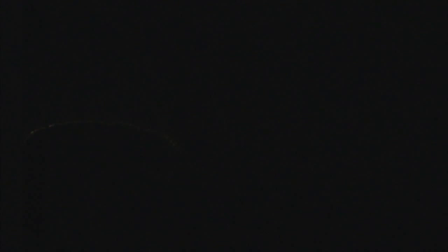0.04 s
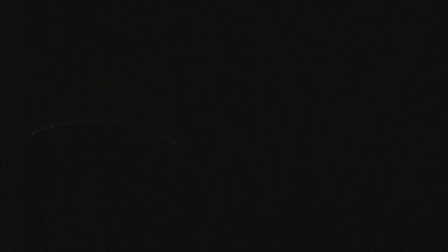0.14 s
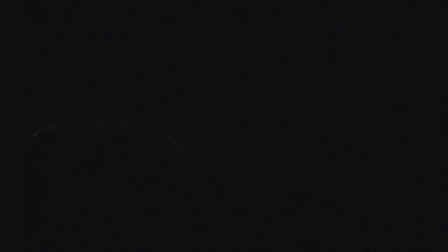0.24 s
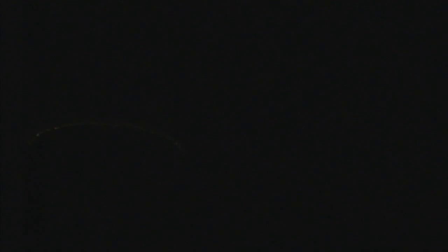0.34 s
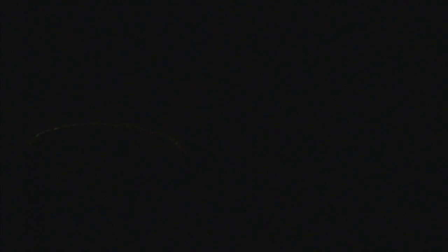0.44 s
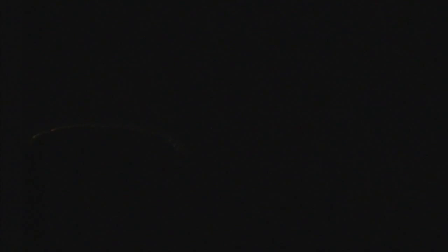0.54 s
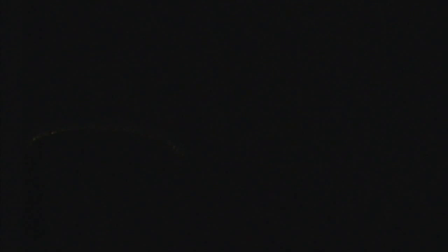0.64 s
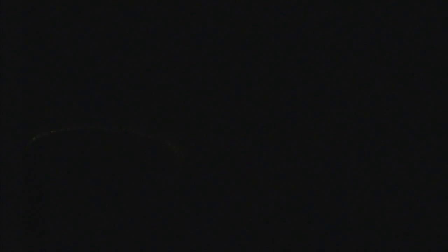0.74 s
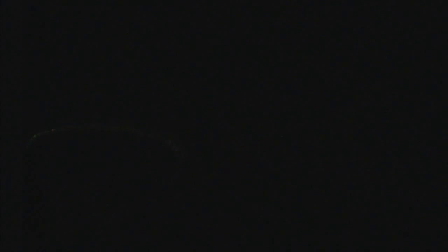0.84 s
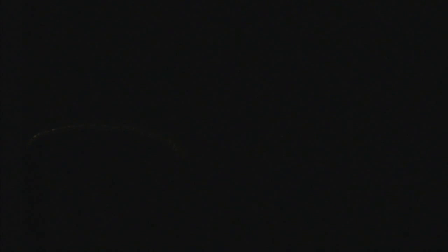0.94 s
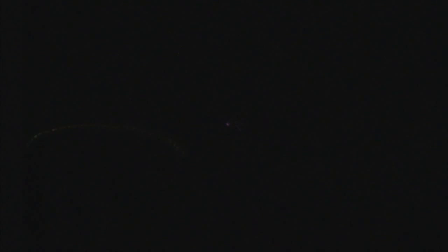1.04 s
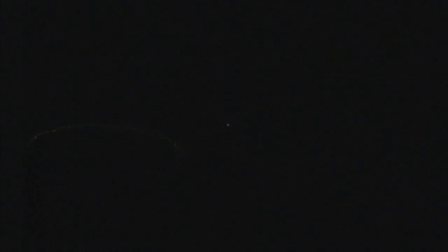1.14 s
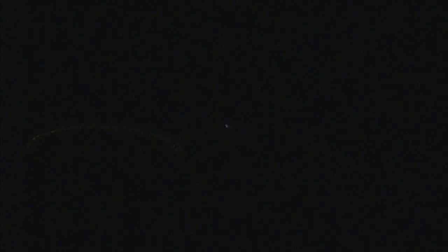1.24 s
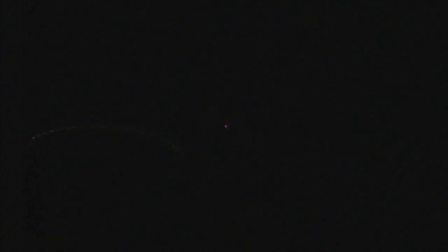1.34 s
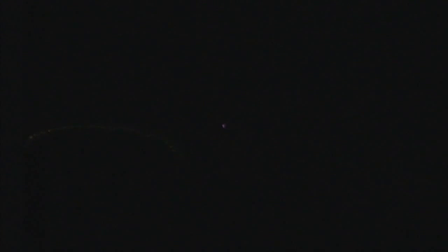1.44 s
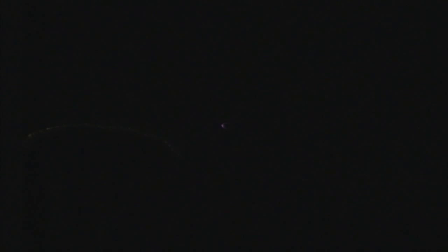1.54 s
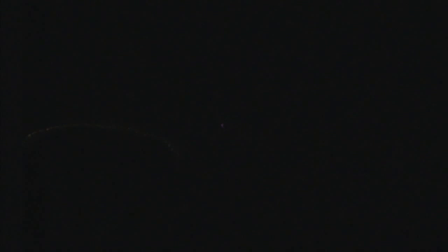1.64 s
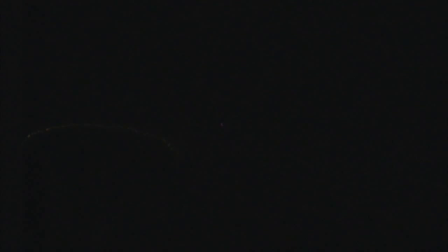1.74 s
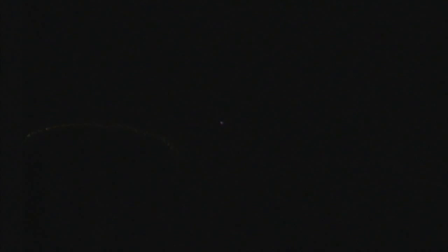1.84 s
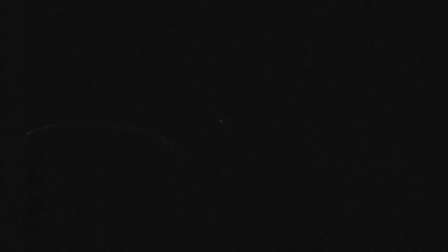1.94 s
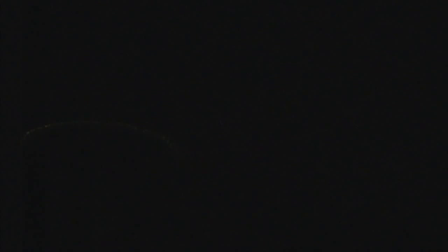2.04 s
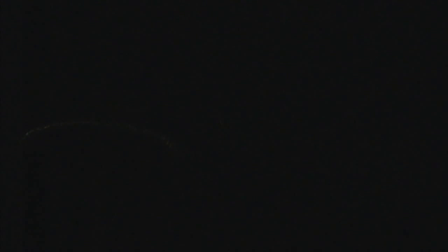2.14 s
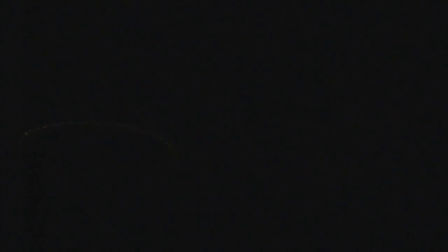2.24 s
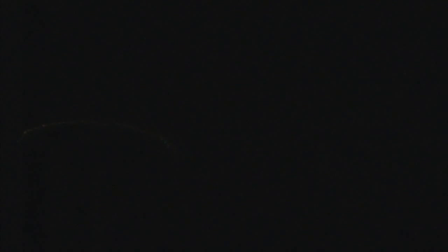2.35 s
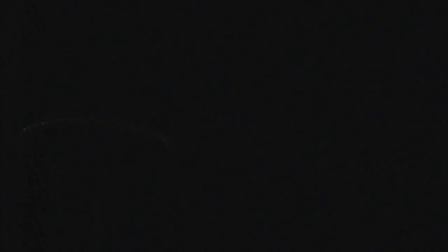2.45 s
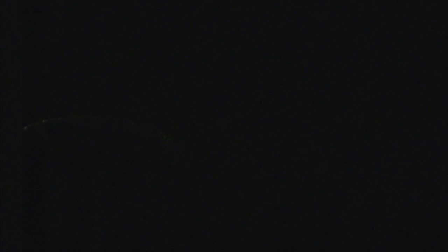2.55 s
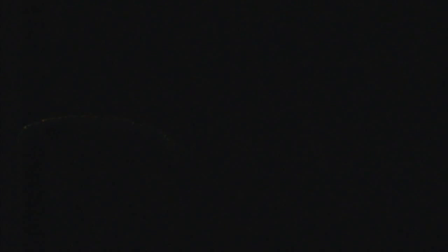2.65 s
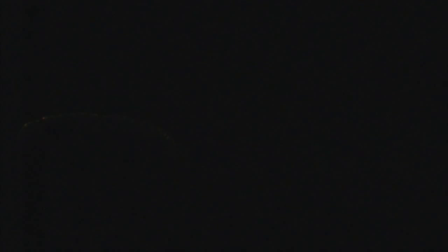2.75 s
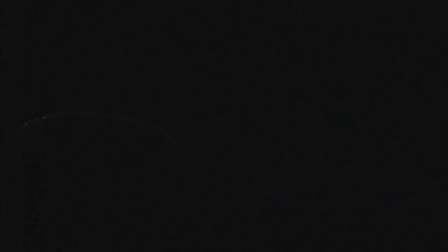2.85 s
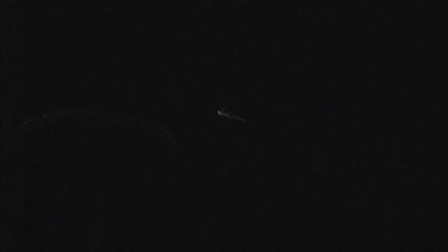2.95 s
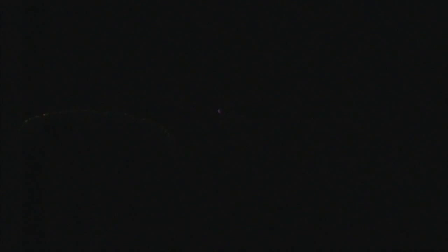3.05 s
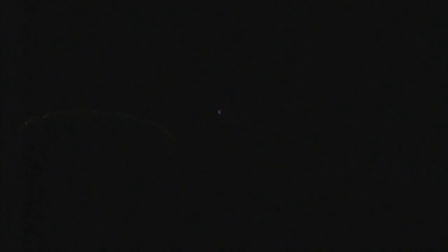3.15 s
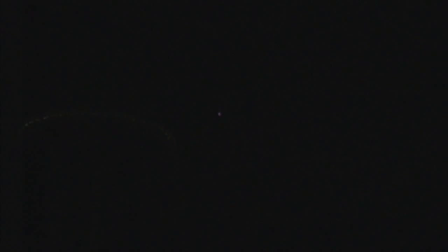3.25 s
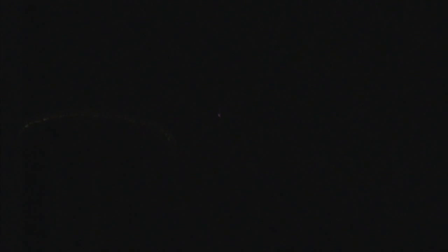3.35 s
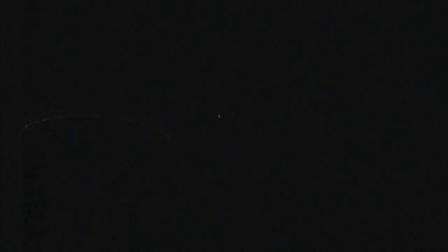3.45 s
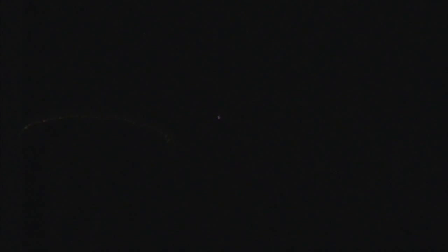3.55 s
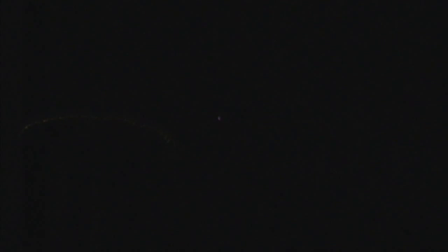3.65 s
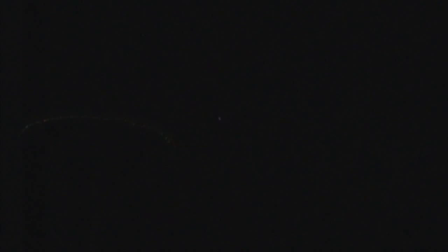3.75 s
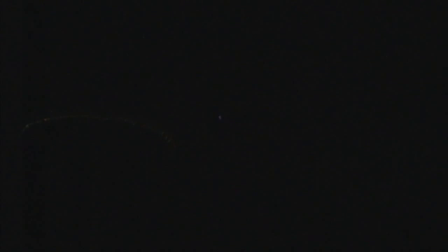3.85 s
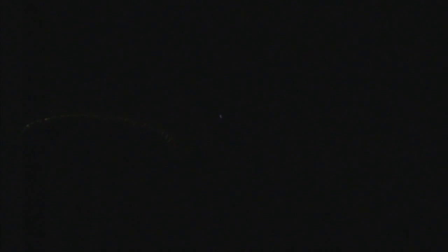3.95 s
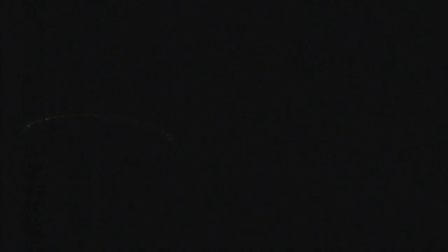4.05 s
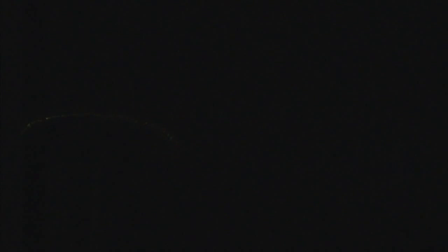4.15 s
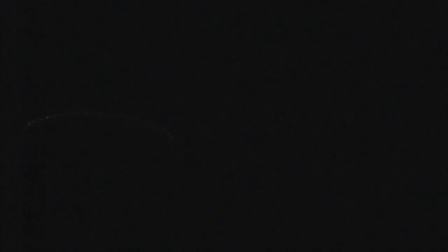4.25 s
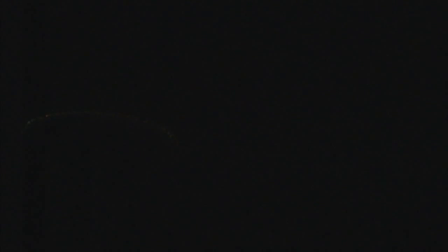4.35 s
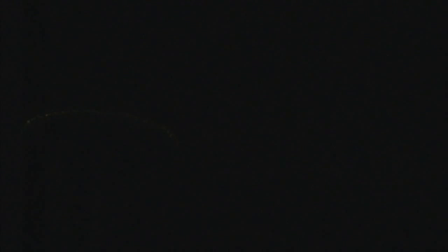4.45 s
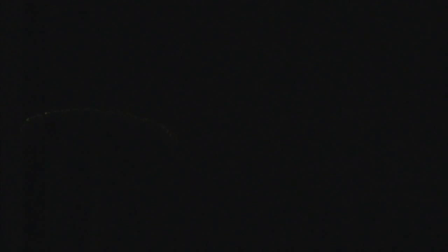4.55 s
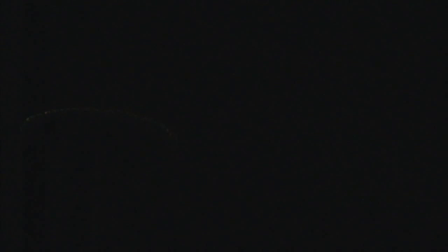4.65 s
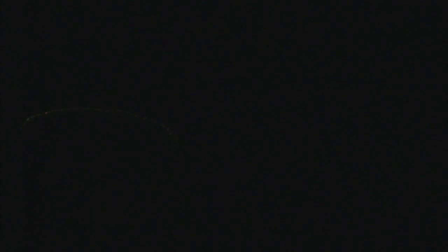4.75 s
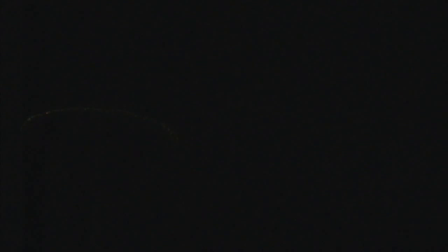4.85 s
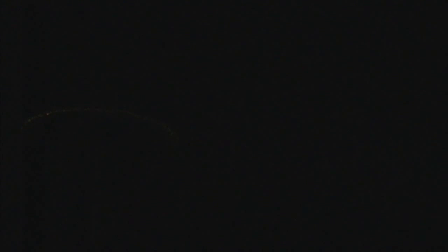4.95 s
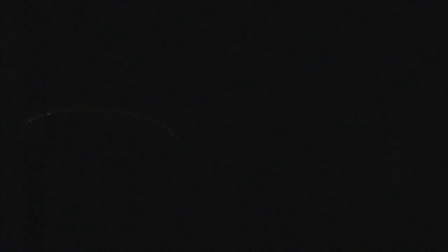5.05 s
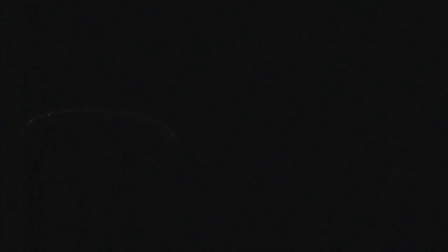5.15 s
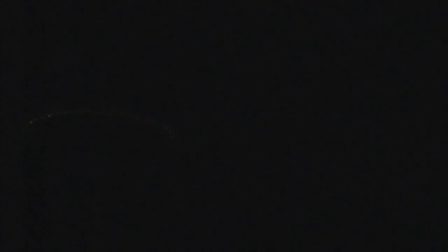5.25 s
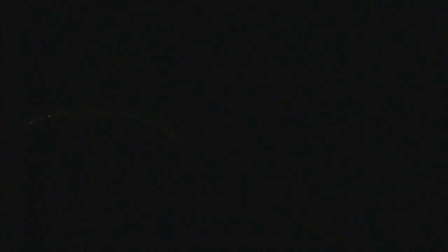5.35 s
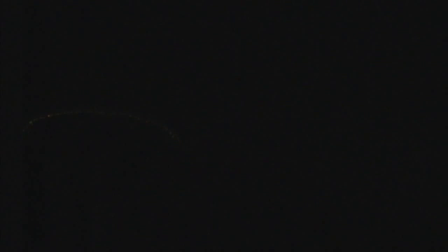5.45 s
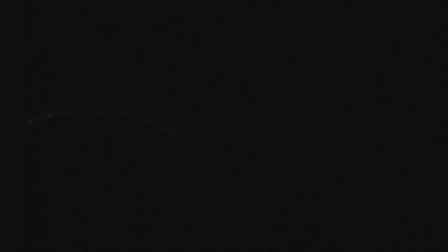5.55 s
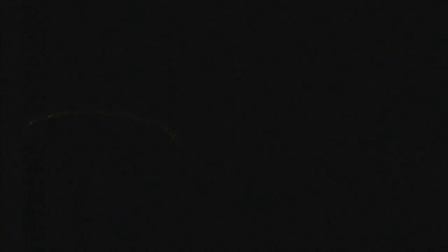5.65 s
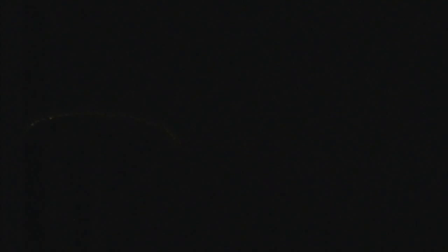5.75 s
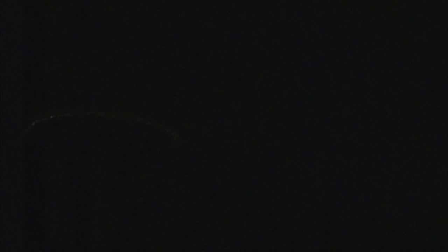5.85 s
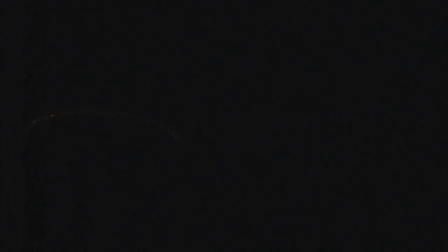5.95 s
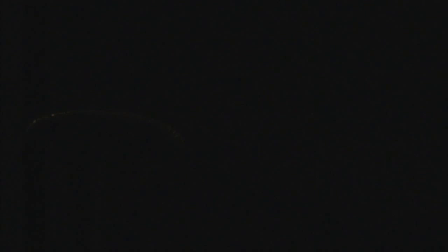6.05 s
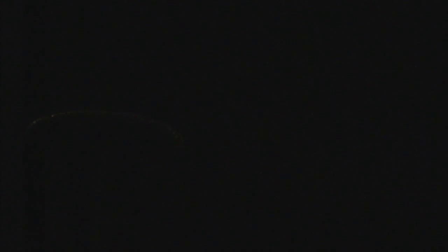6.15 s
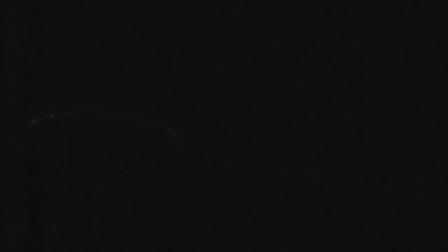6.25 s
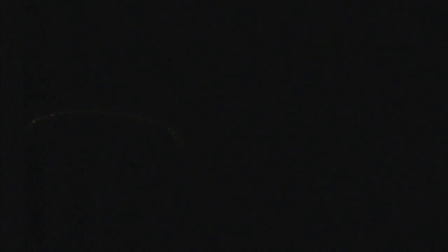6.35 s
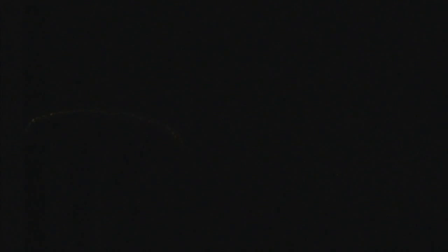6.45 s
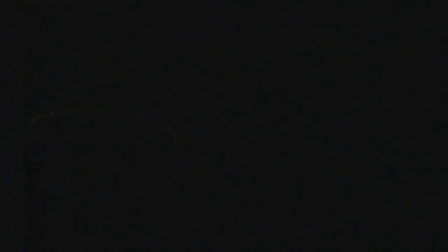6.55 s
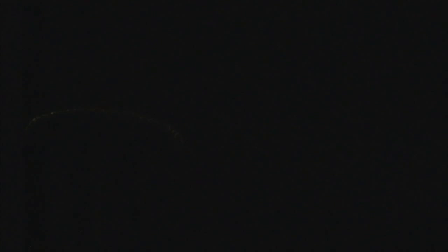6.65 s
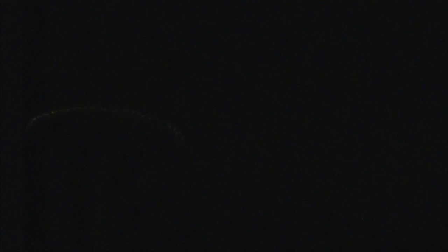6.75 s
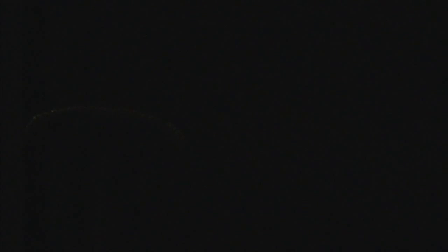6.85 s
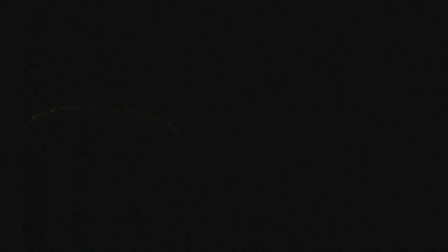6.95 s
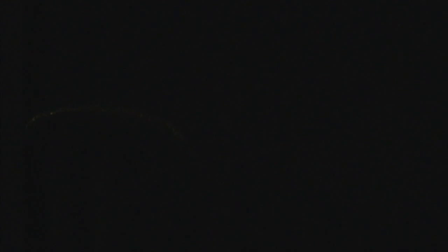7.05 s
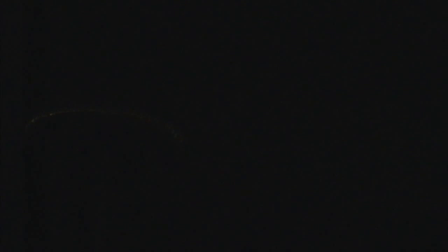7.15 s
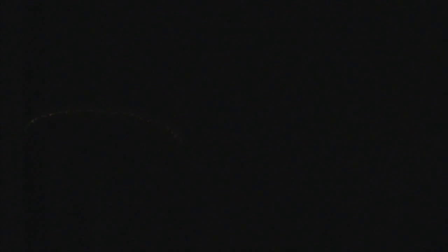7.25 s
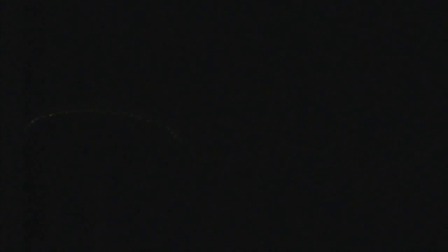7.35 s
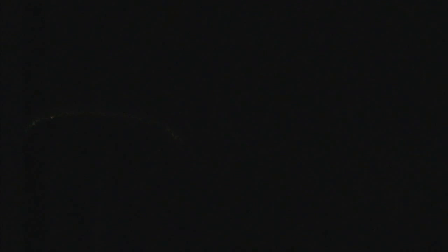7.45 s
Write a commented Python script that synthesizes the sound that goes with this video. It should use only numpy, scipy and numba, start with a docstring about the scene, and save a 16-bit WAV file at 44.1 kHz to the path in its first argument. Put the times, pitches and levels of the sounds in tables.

```python
"""A short, harsh buzz and a crack come first: a spark-gap coil is running outdoors at night.
In each half-wave of the mains its gap fires a quick volley of sparks, which blur into a buzzing hiss.
Two longer bursts start and stop with cracks; later the coil only snaps singly. A blower hisses and
whines throughout, and wind nudges the microphone. The camera's gain control turns all this down
under each burst and slowly lets it back."""
import sys
import numpy as np
from scipy import signal
from scipy.fft import rfft, irfft
from scipy.io import wavfile
from scipy.ndimage import uniform_filter1d, minimum_filter1d
from numba import njit

SR = 44100
rng = np.random.default_rng(int(sys.argv[2]) if len(sys.argv) > 2 else 0)


def transcribe(signal):
    """Save signal, clipped to [-1, 1], as a 16-bit WAV file at the path in sys.argv[1]."""
    frames = np.atleast_2d(signal).T
    limited = np.clip(frames, -1, 1)
    pcm = np.round(limited * 32767).astype(np.int16)
    wavfile.write(sys.argv[1], SR, pcm)


N = 331014
TAPS = 4096  # filter length in samples
T = np.arange(N) / SR
HZ = np.maximum(np.arange(TAPS // 2 + 1) * SR / TAPS, 1)
MAINS_HZ = 60

# when the coil runs: on t/s, off t/s, starting level/dB, thin metal's relative level/dB
BURSTS = [(-.02, .045, 3.5, 3), (1.03, 2.07, -12, 7), (3.001, 4.036, -12.5, -11)]
# pitches at which the gap and its housing ring: f/Hz, width/Hz, level/dB
HOUSING_RINGS = [(670, 70, -16), (1180, 220, -14), (1440, 140, -12), (1620, 130, -13), (1830, 170, -9),
                 (2100, 120, -17), (2300, 150, -16), (2570, 210, -4), (2850, 300, -6), (3230, 190, -10),
                 (3850, 240, -10), (4300, 220, -12), (4600, 300, -13), (5030, 200, -14), (5660, 220, -12),
                 (6200, 380, -11), (6560, 260, -3), (7090, 190, -1), (7380, 230, 0), (7890, 150, -5),
                 (8360, 290, 0), (8850, 380, -4), (9220, 250, -8), (10100, 700, -14), (10720, 330, -9),
                 (11200, 480, -11), (13080, 680, -6), (14040, 300, -3), (14650, 420, -6), (15450, 900, -2)]
# single heavy sparks: t/s, level/dB, crack length/s, boosted f/Hz
HEAVY_SPARKS = [(0.0675, -8.5, 0.0006, 2400), (1.0098, -11, 0.0042, 2470), (1.0188, -4, 0.0008, 7240),
                (1.0241, -3.5, 0.00048, 7940), (1.0312, 3, 0.00045, 7550), (2.079, -11.5, 0.0015, 2400),
                (2.9809, -13, 0.0014, 7000), (2.991, -2, 0.0011, 7300), (3, -8, 0.00052, 4000),
                (3.0062, 1, 0.00063, 7500), (4.044, -10, 0.0011, 2600), (4.8704, -12, 0.0014, 3480),
                (5.7225, -9, 0.00074, 10100), (6.0705, -32.5, 0.0012, 2300), (6.6715, -10.5, 0.0015, 2340)]
# tone colour of a heavy spark: f/Hz, level/dB
SNAP_COLOUR = [(25, -65), (100, -52), (500, -4.5), (1200, -2), (1800, -7), (2400, -7), (3300, -5.5),
               (4100, -5.5), (4700, -9), (5400, -4), (8200, -11), (9900, -5.5), (11200, -10), (12600, -11),
               (16000, -7.5)]
# a dip and peaks that make heavy sparks ring hollowly: f/Hz, width/Hz, lift/dB
HOLLOW_RINGS = [(850, 450, -10), (2280, 320, 7), (4120, 360, 3.5), (5250, 360, 3.5)]
# tone colour of the blower's rushing air: f/Hz, level/dB
RUSH_COLOUR = [(30, -56), (70, -15), (150, -5), (340, -11.5), (900, -5), (1250, 0.5), (2100, -4.5),
               (3200, -2), (5000, -9.5), (7400, -4), (8700, -11.5), (9800, -18.5), (12000, -19),
               (16000, -33)]
# pitches that the blower's duct boosts: f/Hz, width/Hz, lift/dB
DUCT_RINGS = [(506, 390, 6), (1160, 330, 4), (1787, 290, 6), (3016, 720, 5), (3425, 130, 5.5),
              (4360, 460, 9.5), (5300, 440, 7.5), (8800, 300, 3)]
# tones of the blower's whine: multiple of the blade rate, level/dB
BLADE_TONES = [(1, -58.5), (2, -49.5), (3, -50), (5, -55.5), (7, -57.5)]
# the strongest puffs of wind on the microphone: t/s, relative level/dB, length/s
WIND_PUFFS = [(.425, -37, 0.02), (0.906, -31.5, 0.012), (1.181, -40, .029), (1.701, -34, 0.069),
              (4.439, -31.5, 0.021), (4.485, -27, 0.017), (5.127, -45, 0.022), (5.567, -34.5, 0.0089),
              (5.595, -36, 0.014), (5.655, -37.5, 0.02), (7.18, -41, .03), (7.369, -42, .025)]
# tone colour of the wind: f/Hz, level/dB
WIND_COLOUR = [(30, -34), (70, -15), (120, -1.5), (180, 2), (300, -3), (480, -21.5), (1000, -27),
               (4000, -73)]


def buzz(metal_hz=13690, broad_db=-24, bass_cut_hz=1000, leak_db=-14, linger_db=-24, panel_db=-41.5):
    """Sparks ring the housing, which gives off little bass; thin metal sings and a panel hums."""
    power_db, metal_gain = coil_growth()
    clicks = spark_volleys() * undb(power_db)
    clicks = scatter(clicks, lags_s=[.00017, .00029, .00043], share=0.63)
    ring_power = sum((undb(db) * bell(hz, width)) ** 2 for hz, width, db in HOUSING_RINGS)
    rings = np.sqrt(ring_power + undb(broad_db) ** 2)
    bass_cut = 1 / np.sqrt(1 + (bass_cut_hz / HZ) ** 20)
    leak = undb(leak_db) * HZ / (HZ + bass_cut_hz / 2)
    housing = colour(clicks, rings * (bass_cut + leak))
    metal_peak = bell(metal_hz, width_hz=300)
    metal = colour(clicks * metal_gain, metal_peak)
    metal *= np.sqrt(np.sum(metal_peak ** 2) / np.sum(rings ** 2))  # on the housing's scale
    linger = convolve(colour(clicks, bell(metal_hz, width_hz=2000)), tail(t60=0.43))
    panel = colour(clicks, bell(hz=661, width_hz=64))
    return housing + metal + undb(panel_db) * panel + undb(linger_db) * linger


def spark_volleys(count=14, recharge_s=0.00045, skew_s=.00025, jitter_s=.00005,
                  spark_db=2, volley_db=0.3, sag_db=3.0):
    """In each half-wave of the mains the capacitor charges and sparks many times, then rests."""
    half_wave = np.arange(-2, int(2 * MAINS_HZ * N / SR))
    start = .0066 + half_wave / (2 * MAINS_HZ)
    start -= skew_s * (-1.) ** half_wave  # every other half-wave strikes earlier
    switched_on = sum((start > on) & (start < off) for on, off, _, _ in BURSTS) > 0
    start = start[switched_on, None]
    wait, size = rng.standard_normal((2, len(start), count))
    late, strength = rng.standard_normal((2, len(start), 1))
    gaps = np.exp(0.46 * wait)  # uneven waits between sparks
    gaps = recharge_s * gaps / gaps.mean(axis=1, keepdims=True)  # the mains sets a volley's length
    when = start + jitter_s * late + np.cumsum(gaps, axis=1) - gaps
    size = unit(undb(spark_db * size + volley_db * strength - sag_db * np.linspace(0, 1, count)))
    clicks = np.bincount((when[when > 0] * SR).astype(int), size[when > 0], N)
    return clicks * np.sqrt(SR / (2 * MAINS_HZ * count))


def coil_growth(growth_db_per_s=12, metal_swell_s=0.52):
    """From each switch-on the sparks grow stronger, and the thin metal takes a moment to sing up."""
    power_db, metal_gain = np.zeros((2, N))
    for on, _, start_db, metal_db in BURSTS:
        live = T > on - 1 / MAINS_HZ
        since = np.maximum(T[live] - on, 0)
        power_db[live] = start_db + growth_db_per_s * since
        metal_gain[live] = undb(metal_db) * (1 - np.exp(-since / metal_swell_s))
    return power_db, metal_gain


def snaps(typical_db=-11, typical_s=0.0015, pivot_hz=4000, boost_db=6, rattle_db=-16):
    """A long spark's sound arrives spread out: a shock front, an even crack, then a duller rattle."""
    out, t = np.zeros(N + TAPS), T[:TAPS]
    hollow_db = sum(db * bell(hz, width) for hz, width, db in HOLLOW_RINGS)
    for s, db, length, hz in HEAVY_SPARKS:
        tilt_db_per_octave = np.clip(0.26 * (db - typical_db), -6.5, 6.5)  # stronger is brighter
        front_db = 6.5 + 6.5 * np.log2(typical_s / length)  # shorter hits harder
        tilt_db = tilt_db_per_octave * np.log2(HZ / pivot_hz)
        tone = slope(SNAP_COLOUR) * undb(hollow_db + tilt_db + boost_db * bell(hz, width_hz=1000))
        dull_tone = tone / np.sqrt(1 + (HZ / pivot_hz) ** 2)
        crack = rng.choice([-1, 1], TAPS) * fade(np.maximum(t - length, 0), t60=0.021)
        crack[0] = undb(front_db)
        rattle = rng.standard_normal(TAPS) * fade(np.abs(t - length), t60=0.049)
        i = int(s * SR)
        out[i:i + TAPS] += undb(db) * (colour(crack, tone) + undb(rattle_db) * colour(rattle, dull_tone))
    return out[:N]


def yard_echo(x, wall_s=.058, wall_db=-28, bass_cut_hz=5000, far_db=-24.5, air_hz=8500):
    """One wall throws back the treble of the sparks; distant things add a faint, duller tail."""
    far = colour(convolve(x, tail(t60=0.61)), 1 / np.sqrt(1 + (HZ / air_hz) ** 4))
    wall = colour(delay(x, wall_s), HZ / (HZ + bass_cut_hz))
    return undb(wall_db) * wall + undb(far_db) * far


def blower(rush_db=-36.0, blade_hz=588.4, waver=0.00301, flutter_db=2.5):
    """Air rushes steadily through a duct while the blades whine, wavering a little."""
    duct = undb(sum(db * bell(hz, width) for hz, width, db in DUCT_RINGS))
    rush = colour(rng.standard_normal(N), slope(RUSH_COLOUR) * duct) * undb(rush_db)
    pitch_hz = blade_hz * (1 + waver * wander(45) + waver / 2 * wander(2))
    phase = 2 * np.pi * np.cumsum(pitch_hz) / SR
    whine = sum(undb(db + flutter_db * wander(25)) * np.sin(k * phase) for k, db in BLADE_TONES)
    return rush + np.sqrt(2) * whine


def wind(breeze_db=-56, gust_db=1.5, eddy_db=2.5, swirl_db=-3, thump_db=-2, thump_s=0.00836):
    """A light breeze rumbles on the microphone; each puff gives it one push amid a short swirl."""
    noise = rng.standard_normal(N)
    swirl = sum(undb(db + swirl_db) * hump(s, length / 2) for s, db, length in WIND_PUFFS)
    swell_db = 8 * hump(peak_s=4.8, spread_s=0.29)  # the breeze picks up once
    breeze = undb(breeze_db + swell_db + gust_db * wander(4.1) + eddy_db * wander(30))
    pressure = noise * (swirl + breeze)
    for s, db, _ in WIND_PUFFS:
        pressure[int((s - thump_s / 2) * SR)] += undb(db + thump_db) * np.sqrt(thump_s * SR)
    return colour(pressure, slope(WIND_COLOUR))


def gain_control(x, threshold_db=-22, firmness=0.85, start_cut_db=27.5,
                 attack_s=0.0061, hold_s=0.046, release_db_per_s=35):
    """The camera turns itself down on loud, bright sound, waits a moment and recovers slowly."""
    bright = signal.lfilter([1, -0.66], [1], x)
    power = uniform_filter1d(bright ** 2, size=44)  # averaged over about 1 ms
    level_db = 10 * np.log10(np.maximum(power, 1e-12))
    excess_db = firmness * np.maximum(level_db - threshold_db, 0)
    cut_db = follow(excess_db, start_cut_db, 1 / (attack_s * SR), release_db_per_s / SR)
    reach = int(hold_s * SR / 2)
    held_gain_db = minimum_filter1d(-cut_db, 2 * reach + 1, origin=reach, mode="nearest")
    return x * undb(held_gain_db)


@njit
def follow(excess, start, attack, release):
    """How many dB to turn down: rises quickly towards the excess, then shrinks at a steady rate."""
    cut, now = np.empty(len(excess)), start
    for i in range(len(excess)):
        if excess[i] > now:
            now += attack * (excess[i] - now)
        else:
            now = max(now - release, excess[i])
        cut[i] = now
    return cut


def scatter(x, lags_s, share):
    """Nearby surfaces smear each click in time without changing its tone colour."""
    lag = np.exp(-2j * np.pi * HZ * np.array(lags_s)[:, None])
    all_passes = (lag - share) / (1 - share * lag)
    return convolve(x, irfft(np.prod(all_passes, axis=0)))


def colour(x, gain):
    """Filter a sound by a gain for each frequency; white noise keeps its power."""
    cepstrum = irfft(np.log(unit(gain) + 1e-6))
    cepstrum[1:TAPS // 2] *= 2  # folded so that ringing comes after a click, never before
    cepstrum[TAPS // 2 + 1:] = 0
    return convolve(x, irfft(np.exp(rfft(cepstrum))))


def convolve(x, response):
    """Give every sample of a sound the same ring or echo."""
    return signal.oaconvolve(x, response)[:len(x)]


def slope(points):
    """Gain at every frequency, from points of f/Hz, level/dB."""
    hz, db = np.transpose(points)
    return undb(np.interp(np.log(HZ), np.log(hz), db))


def bell(hz, width_hz):
    """A peak of height 1 around one ringing pitch."""
    return 1 / (1 + (2 * (HZ - hz) / width_hz) ** 2)


def hump(peak_s, spread_s):
    """A smooth rise to 1 and back in time."""
    return np.exp(-((T - peak_s) / spread_s) ** 2 / 2)


def fade(t, t60):
    """A fall of 60 dB every t60 seconds."""
    return np.exp(-np.log(1000) * t / t60)


def tail(t60):
    """A second of dying noise with a total energy of 1."""
    return unit(rng.standard_normal(SR) * fade(T[:SR], t60)) / np.sqrt(SR)


def delay(x, lag_s):
    """The same sound, later."""
    return np.interp(np.arange(N) - round(lag_s * SR), np.arange(N), x, left=0)


def wander(rate_hz):
    """A smooth random drift with a spread near 1."""
    step = int(SR / rate_hz)
    stairs = np.repeat(rng.standard_normal(N // step + 1), step)[:N]
    return unit(uniform_filter1d(stairs, step))


def undb(db):
    """Decibels to gain."""
    return 10 ** (np.asarray(db) / 20)


def unit(x):
    """Scale to an average power of 1."""
    return x / np.sqrt(np.mean(x ** 2))


def scene(snap_echo_db=-9):
    """Coil, yard, blower and wind at one microphone; the snaps echo less than the buzz."""
    gap, sparks = buzz(), snaps()
    echo = yard_echo(gap + undb(snap_echo_db) * sparks)
    return (gap + sparks + echo + blower() + wind())[None]


def record(dry, top_hz=15800):
    """The camera controls its gain, flattens peaks at full scale and cuts the highest treble."""
    sound = np.clip(gain_control(dry[0]), -1, 1)
    top_cut = signal.ellip(10, .1, 80, top_hz, fs=SR, output="sos")
    return signal.sosfilt(top_cut, sound)[None]


dry = scene()
out = record(dry)
transcribe(out)
```